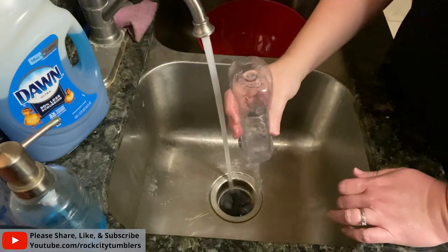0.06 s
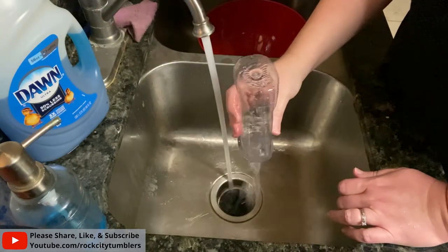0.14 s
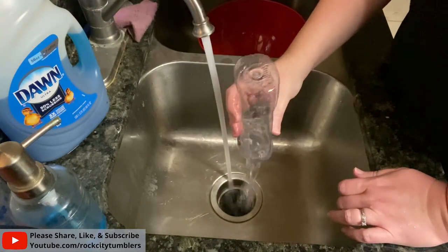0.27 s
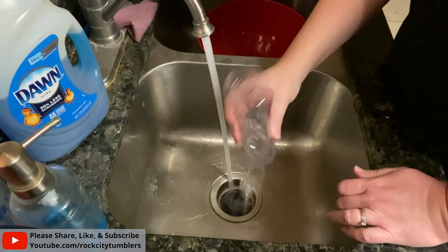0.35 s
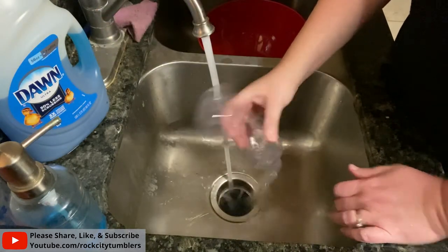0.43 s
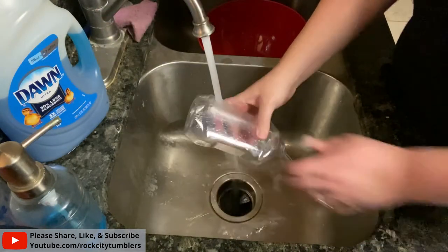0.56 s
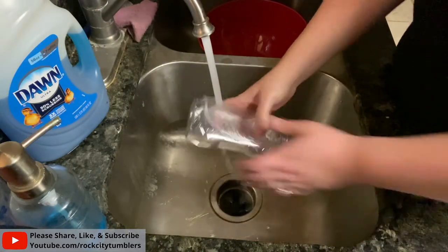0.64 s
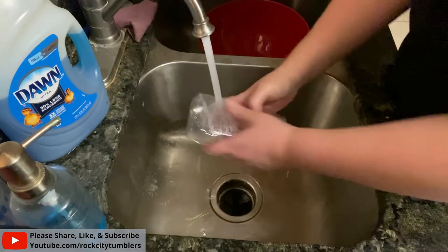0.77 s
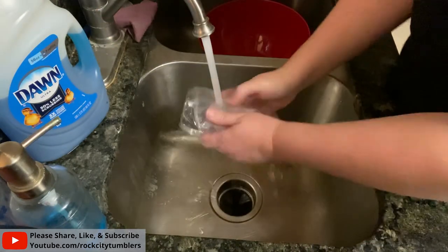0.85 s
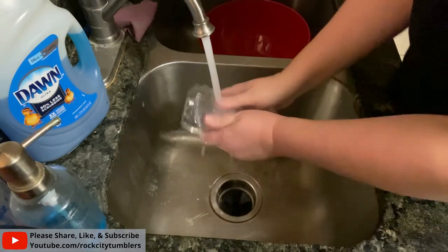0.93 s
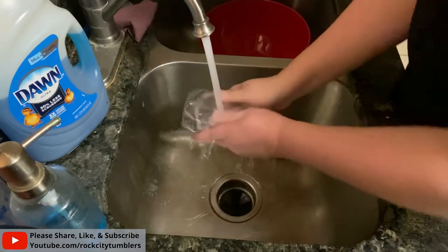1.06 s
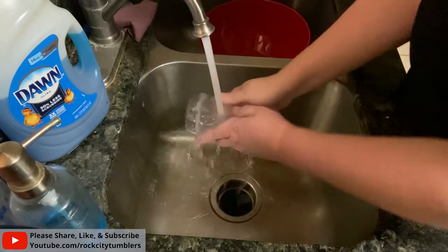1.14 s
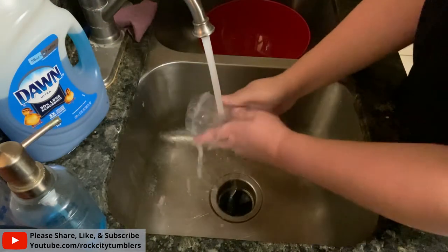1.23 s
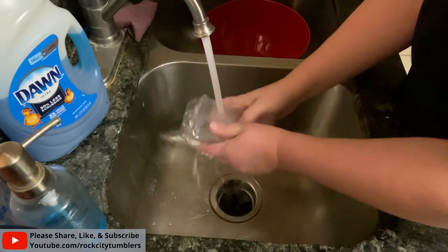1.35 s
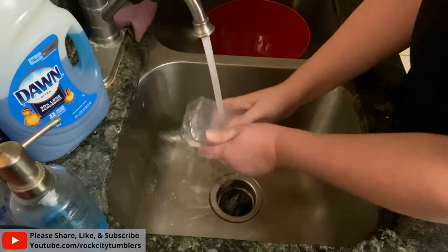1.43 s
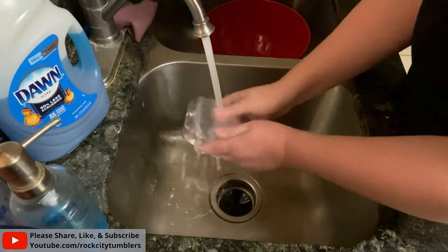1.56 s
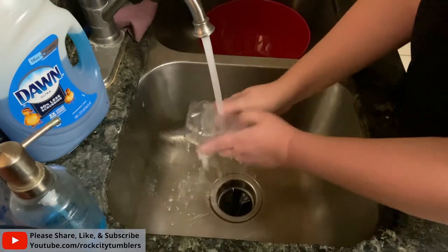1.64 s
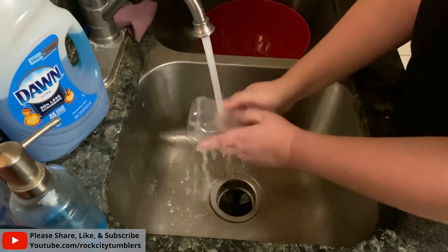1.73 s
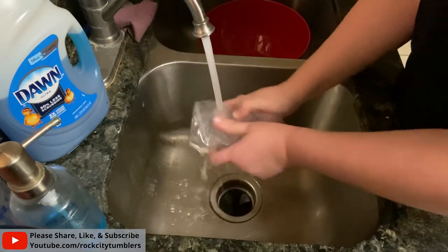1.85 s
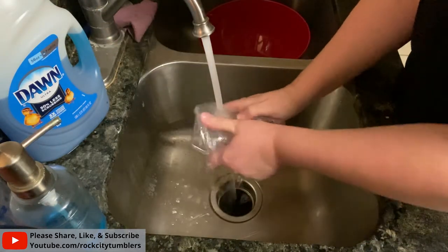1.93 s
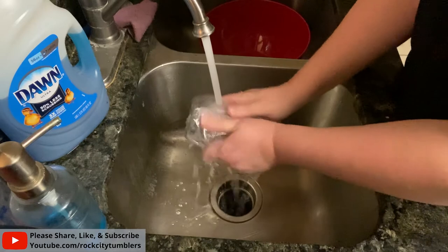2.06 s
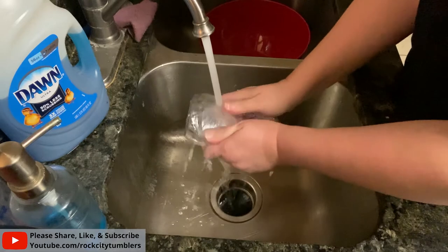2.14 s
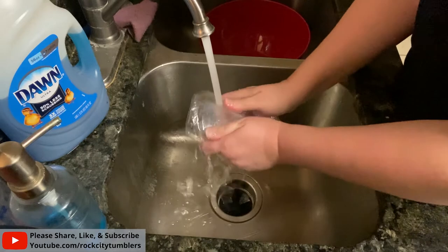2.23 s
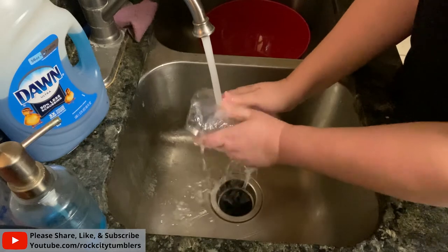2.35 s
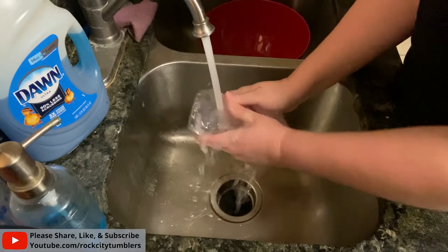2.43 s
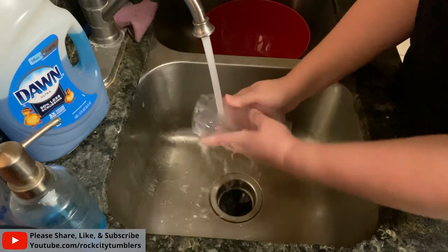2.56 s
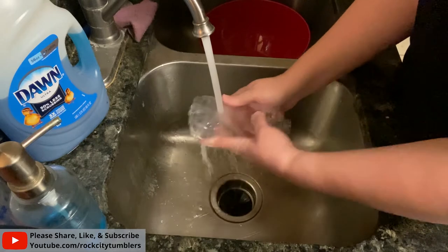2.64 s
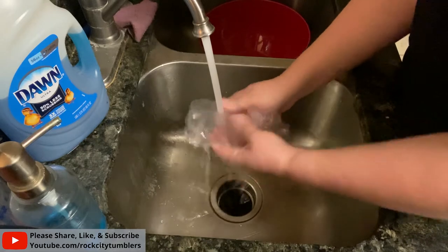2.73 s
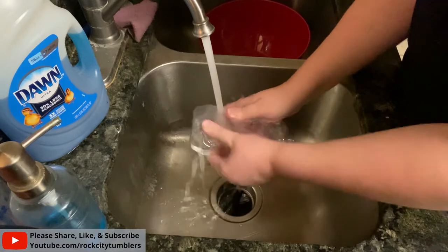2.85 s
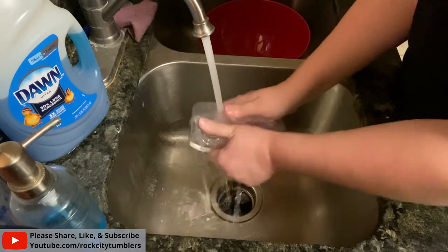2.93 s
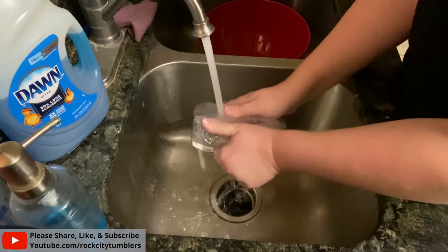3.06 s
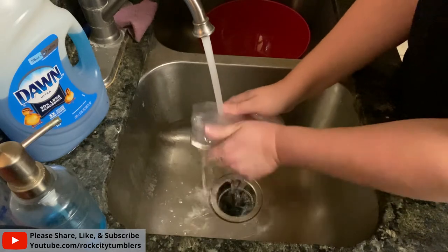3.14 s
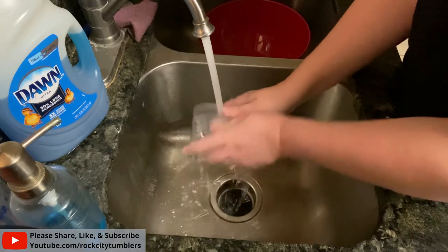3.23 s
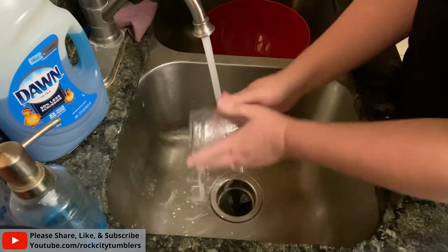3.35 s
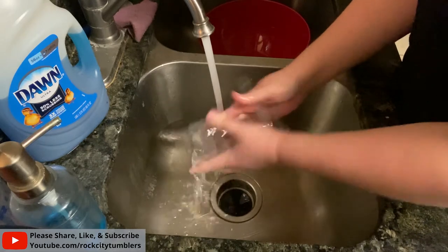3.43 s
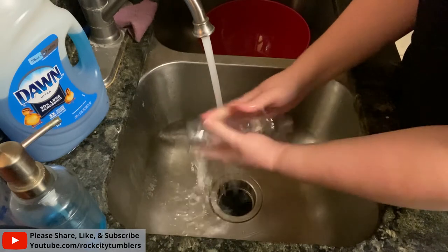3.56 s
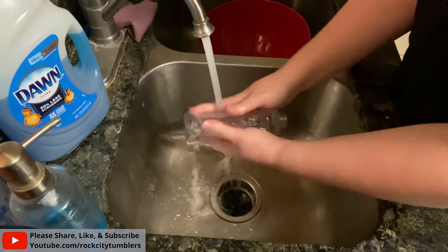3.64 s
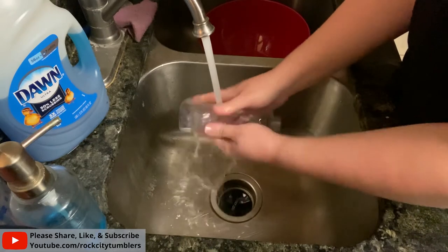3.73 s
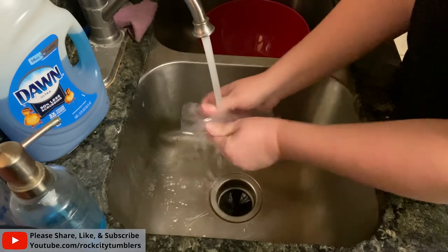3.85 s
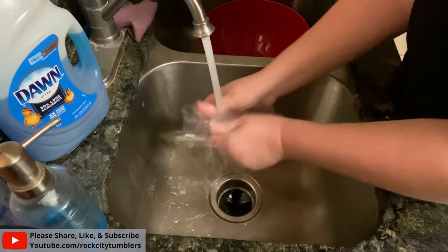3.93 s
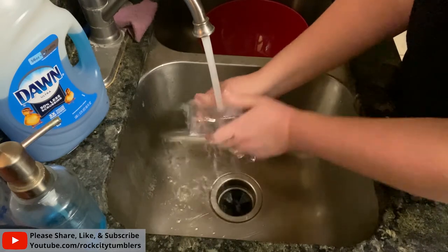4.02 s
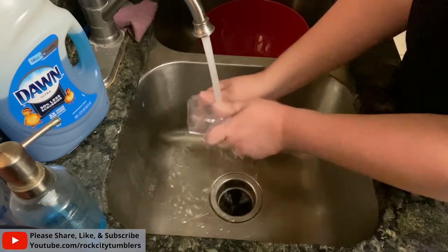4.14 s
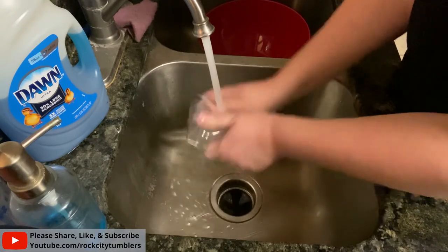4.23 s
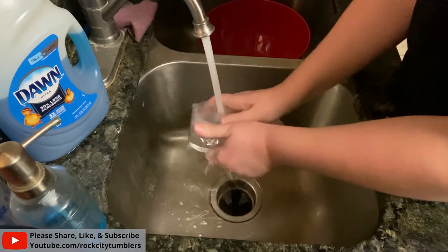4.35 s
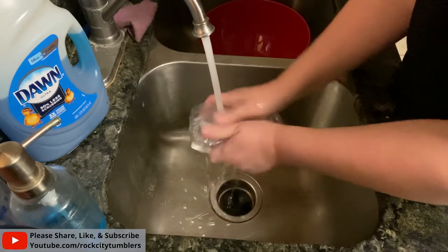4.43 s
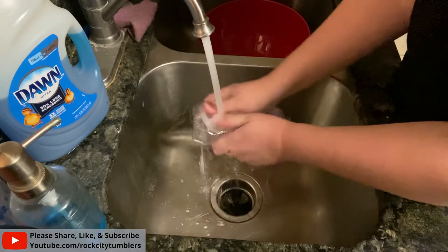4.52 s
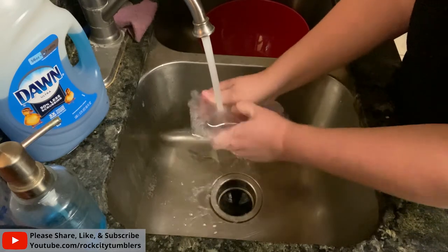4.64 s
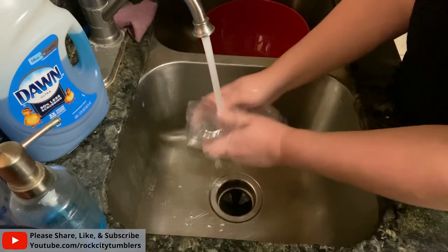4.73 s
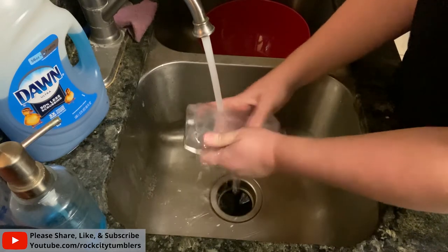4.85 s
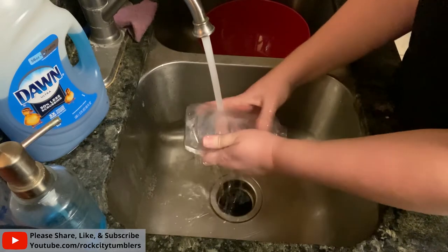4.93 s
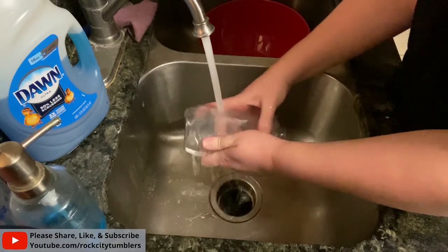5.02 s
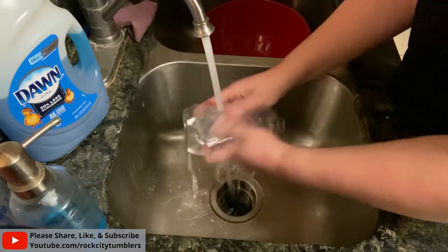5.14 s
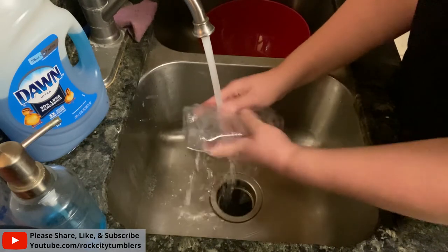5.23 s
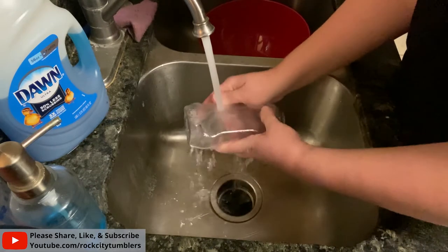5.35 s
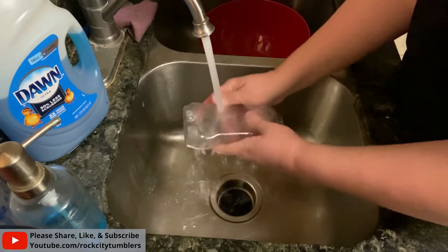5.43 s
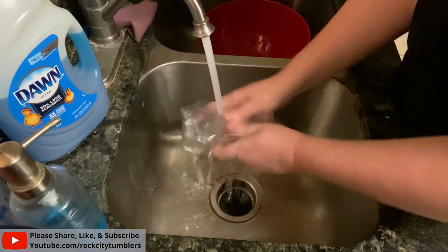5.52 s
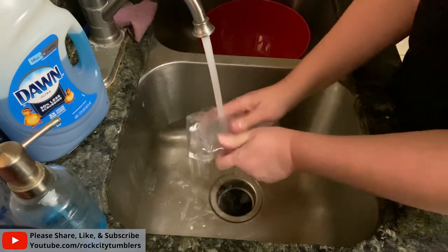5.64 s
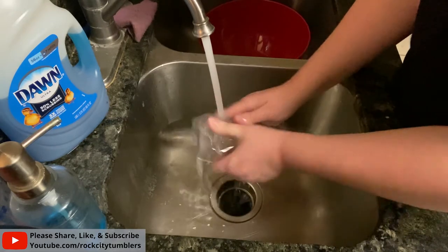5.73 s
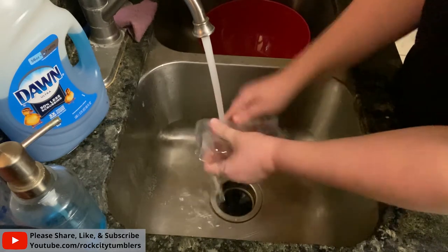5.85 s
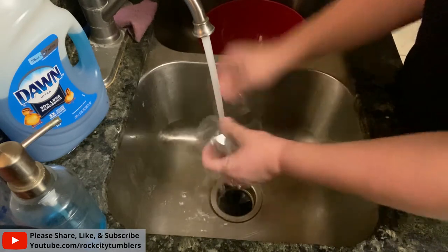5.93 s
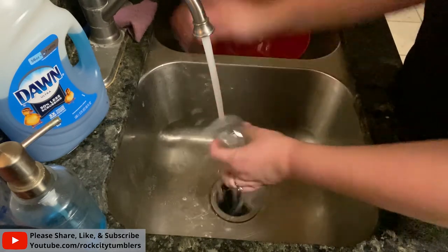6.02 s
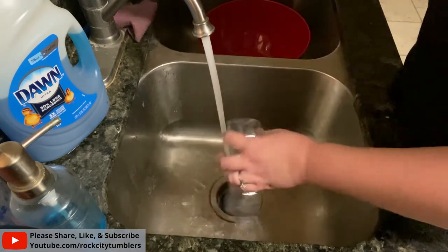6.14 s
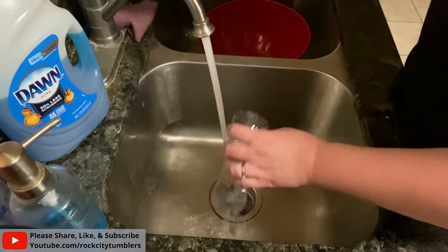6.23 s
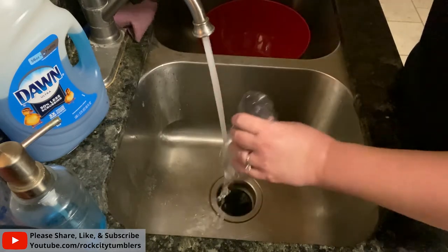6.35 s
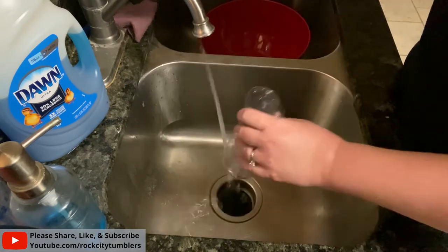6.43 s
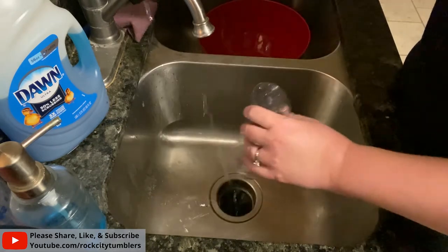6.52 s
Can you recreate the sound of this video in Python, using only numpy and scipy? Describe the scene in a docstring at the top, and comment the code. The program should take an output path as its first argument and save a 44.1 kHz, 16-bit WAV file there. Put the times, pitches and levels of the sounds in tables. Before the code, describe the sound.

A kitchen tap runs throughout with a bright, fizzy hiss, heard close and in stereo from above a steel sink. At first the stream patters lightly on the drain strainer, with a few soft thuds. From about 0.7 seconds, water spills off hands rinsing a plastic bottle, growing louder by 1 second. It lands in irregular surges, several a second, drumming hollowly on the sink floor, ringing the walls and spattering. Heavy lumps of water thud, a few ringing low around 1.6, 1.8 and 4.2 seconds. The drumming eases briefly after 3.2 seconds, then returns, with bubbly plops thickest from 3.7 to 5.7 seconds. Around 5.9 seconds the surges give way to a trickle, single drops tick on the steel, and the stream finds the drain again. At about 6.4 seconds the hiss dulls as the tap closes. A faint fridge hum and low rumble lie underneath.

```python
"""Water drums on a steel sink, spilling in surges off hands that rub a plastic bottle under a kitchen tap.
Each surge booms on the sink floor, rings the walls and spatters the rim; heavy lumps land as thuds,
a few ringing long and low. Bubbles plop and single drops tick on the steel. Behind them the tap's aerator
hisses, its stream fizzes and rings the drain strainer, and the hiss dulls as the valve shuts at the end.
A fridge hum and a low rumble lie underneath. The perspective is close stereo, from above the sink."""
import sys
import numpy as np
from scipy import signal
from scipy.fft import rfft, irfft, next_fast_len
from scipy.io import wavfile
from scipy.ndimage import map_coordinates

SR = 44100
rng = np.random.default_rng(int(sys.argv[2]) if len(sys.argv) > 2 else 0)


def inscribe(sig):
    """Save sig as 16-bit PCM at rate SR to the path in sys.argv[1].

    A 1-D sig is mono; a 2-D sig holds one channel per row.
    Samples are clipped to [-1, 1] before scaling.
    """
    pcm = np.round(np.clip(np.atleast_2d(sig).T, -1, 1) * 32767)
    wavfile.write(sys.argv[1], SR, pcm.astype(np.int16))


N = 290169

# Surges landing on steel: (start [s], rise [s], hold [s], drumming [dB], ringing [dB], spatter [dB])
SURGES = [(0.7, 0.05, 0.033, -39, -37, -56), (0.807, 0.094, 0.046, -33, -54, -52),
          (0.988, 0.033, 0.27, -26.5, -29.5, -33), (1.216, 0.045, 0.087, -24.5, -31, -35.5),
          (1.367, 0.046, 0.24, -22.5, -33, -36), (1.651, 0.074, 0.22, -23.5, -32.5, -35.5),
          (2, 0.056, 0.12, -30, -34, -40), (2.272, 0.027, 0.035, -28.5, -35, -37),
          (2.33, 0.17, 0.028, -19.5, -28.5, -33.5), (2.521, 0.034, 0.099, -35.5, -35.5, -36),
          (2.693, 0.034, 0.012, -30.5, -31.5, -31), (2.812, 0.011, 0.21, -22.5, -35, -37.5),
          (3.058, 0.08, 0.099, -30.5, -30, -37), (3.224, 0.054, 0.042, -39, -35, -36.5),
          (3.346, 0.038, 0.12, -41.5, -44.5, -40.5), (3.489, 0.044, 0.037, -34, -34.5, -39),
          (3.59, 0.027, 0.0091, -33, -39, -35), (3.658, 0.03, 0.054, -31.5, -27.5, -36),
          (3.726, 0.064, 0.095, -41, -28.5, -32.5), (3.86, 0.076, 0.11, -32, -31.5, -38.5),
          (4.076, 0.065, 0.17, -27.5, -29, -34.5), (4.392, 0.038, 0.14, -26.5, -30, -34),
          (4.56, 0.059, 0.088, -26.5, -33.5, -37.5), (4.653, 0.091, .12, -26, -25, -28),
          (4.88, 0.038, 0.063, -41, -43, -38.5), (5.068, 0.055, 0.057, -26.5, -28, -35.5),
          (5.219, 0.03, 0.0084, -22, -27.5, -42), (5.272, 0.029, 0.011, -22.5, -27.5, -36),
          (5.387, 0.048, 0.035, -32, -35.5, -38.5), (5.511, 0.03, 0.048, -28, -23.5, -30),
          (5.634, 0.039, 0.034, -26, -27.5, -34), (5.698, 0.029, 0.051, -31, -35.5, -43),
          (5.805, 0.022, 0.012, -33, -36, -37.5)]
# The trickle bed under the surges: (time [s], drumming [dB], ringing [dB], spatter [dB])
TRICKLE = [(0, -44, -50, -47.5), (.57, -39.5, -51, -47), (.6, -44.5, -51, -50), (.75, -40.5, -57, -46),
           (5.8, -49, -70, -68), (5.88, -37, -47.5, -46), (6.4, -44, -51, -56), (6.58, -50, -66, -74)]
# Tone of the spot the spill hits: (time [s], floor bass tilt [dB/octave], wall treble tilt [dB/octave])
LANDING_SPOT = [(0, 11.5, 10), (.5, 9, 11.5), (1, 0.5, -1), (1.5, 0.5, 5.5), (2, -2.5, -1), (2.5, 6, 1.5),
                (3, -3.5, 0.5), (3.5, -0.5, 0.5), (3.8, -8, 4), (4.1, -7, 4), (4.5, -3, -2.5),
                (4.9, 0, -1.5), (5.2, 3.5, 6), (5.6, 4, -1.5), (6, -2, 3), (6.58, 10, -5)]
# Resonances of the steel: (pitch [Hz], width [Hz], relative weight [dB], right-to-left gain [ratio])
FLOOR_MODES = [(144.3, 20, -11.5, 0.97), (191, 32, -5, 0.98), (232, 26.5, 0.5, 0.83), (289.8, 50.6, 3.5, 1),
               (359.2, 21.4, -2, 0.74), (404.5, 16, -14, 1)]
WALL_MODES = [(484, 124, 12, -0.57), (613.8, 22.4, 1.5, 0.43), (696, 22, -1, 0.034), (800, 41, -1.5, -0.15),
              (970, 100, 1.5, 1), (1108, 64, 1, 0.6), (1230, 65, 0, 0.63)]
RIM_MODES = [(1532, 46, -0.5, 0.79), (1791, 63, 4.5, 0.99), (1943, 43, 2.5, 0.97), (2296, 96, 4, 0.15),
             (2660, 126, 5.5, 0.78), (3012, 49, 2.5, 0.62), (3444, 65, 0, 0.49)]
STRAINER_MODES = [(2870, 250, 8.5, 0.4), (3600, 660, 6, 0.37), (4600, 330, 2, 0.23)]
# Heavy lumps of water: (time [s], peak before the bass cut [dB], pitch [Hz], relative splash [dB])
THUDS = [(0.234, -32, 247, -43), (0.369, -28, 142, -58), (0.471, -22, 149, -38), (0.546, -28, 138, -45),
         (0.722, -27.5, 377, -38), (0.833, -28, 312, -27), (0.871, -22.5, 323, -28), (0.892, -25, 273, -30),
         (0.932, -21.5, 288, -26), (0.966, -21, 250, -33), (1.005, -19, 304, -39), (1.023, -12.5, 263, -40),
         (1.057, -17.5, 237, -34), (1.128, -24, 370, -43), (1.266, -20, 250, -25), (1.3, -16, 236, -36),
         (1.353, -15.5, 252, -44), (1.427, -12.5, 211, -34), (1.528, -22, 232, -32), (1.664, -16, 196, -24),
         (1.727, -11, 292, -45), (1.848, -15, 260, -40), (1.875, -25, 290, -38), (1.92, -14.5, 254, -32),
         (2.038, -24, 276, -22), (2.122, -20, 199, -48), (2.15, -18, 260, -44), (2.297, -20.5, 175, -30),
         (2.313, -17.5, 358, -40), (2.455, -19.5, 317, -44), (2.499, -16.5, 210, -43),
         (2.723, -26, 230, -35), (2.825, -10, 285, -19.5), (2.862, -19, 300, -48), (2.9, -18.5, 320, -29),
         (2.966, -15, 310, -25), (2.984, -17, 320, -23), (3.013, -15.5, 325, -23.5), (3.134, -29, 327, -32),
         (3.166, -25, 219, -41), (3.33, -18, 314, -30), (3.416, -28, 144, -27), (3.459, -41, 142, -28),
         (3.541, -22.5, 258, -42), (3.62, -21, 276, -25), (3.685, -22, 330, -28), (3.71, -20, 300, -30),
         (3.884, -19, 340, -36), (3.913, -13, 301, -21), (3.95, -14, 268, -23), (4.018, -15.5, 317, -27),
         (4.067, -21.5, 373, -28), (4.184, -10.5, 254, -44), (4.219, -18, 292, -41),
         (4.265, -12.5, 274, -20), (4.446, -15.5, 273, -36), (4.481, -12, 268, -37),
         (4.493, -9.5, 285, -38), (4.565, -18.5, 325, -20), (4.596, -17.5, 334, -21),
         (4.754, -16.5, 263, -20), (4.817, -16.5, 347, -32), (4.843, -14, 278, -28), (5.111, -23, 287, -28),
         (5.148, -20, 190, -18), (5.244, -13, 241, -18), (5.301, -14.5, 253, -33), (5.315, -16, 348, -36),
         (5.523, -19.5, 337, -29), (5.669, -30, 320, -17), (5.684, -19, 234, -35), (5.699, -19, 232, -36),
         (5.829, -16, 308, -27)]
# Bubble plops, plus a few long, low ringing thuds of water on the sink floor (the 236-330 Hz rows):
# (time of the peak [s], peak before panning [dB], pitch [Hz], t60 [s])
PLOPS_AND_LONG_THUDS = [(.18, -36, 905, 0.061), (.727, -31.5, 1450, 0.027), (0.742, -31, 1206, 0.14),
                        (0.875, -31.5, 1184, 0.03), (.941, -34, 620, 0.04), (1.012, -31, 744, 0.06),
                        (1.04, -28, 689, 0.037), (1.067, -23, 628, 0.054), (1.142, -26.5, 544, 0.043),
                        (1.224, -30, 1970, .03), (1.242, -23.5, 611, 0.047), (1.75, -27, 990, .03),
                        (1.57, -20.5, 235.7, 0.31), (1.818, -13.5, 292.8, 0.29), (1.945, -29, 724, 0.056),
                        (2.75, -19.5, 618, 0.073), (2.83, -28, 547, 0.023), (2.973, -33, 2476, 0.03),
                        (3.017, -29, 1195, 0.028), (3.145, -32, 1033, 0.027), (3.463, -31, 2560, .035),
                        (3.468, -29, 631, 0.069), (3.715, -31, 1250, 0.085), (3.74, -20.5, 671, 0.067),
                        (3.767, -25, 1090, 0.071), (3.755, -33, 2250, .04), (3.769, -37, 2270, 0.1),
                        (3.771, -32, 1670, 0.073), (3.816, -30, 1700, 0.074), (3.799, -18.5, 1080, 0.0445),
                        (3.773, -34, 3270, .06), (3.797, -39, 2680, .05), (3.848, -35, 2950, 0.057),
                        (3.868, -30, 3030, 0.036), (3.818, -20.5, 1079, 0.0446),
                        (3.865, -24.5, 2250, 0.0237), (3.973, -20.5, 787, 0.085), (3.991, -19, 633, 0.047),
                        (4.025, -24, 635, 0.031), (4.139, -25, 580, 0.05), (4.164, -24, 600, 0.043),
                        (4.227, -28, 1023, 0.061), (4.24, -15, 319, 0.17), (4.441, -26, 1220, 0.035),
                        (4.469, -21, 623, 0.091), (4.713, -22.5, 585, 0.068), (4.728, -27.5, 2480, 0.0413),
                        (4.769, -19.5, 664, 0.15), (4.774, -25, 1170, 0.032), (4.784, -26.5, 1970, 0.065),
                        (4.819, -31, 1886, 0.036), (4.927, -30.5, 718, 0.094), (4.955, -28, 2095, 0.029),
                        (4.958, -30.5, 2760, .03), (4.959, -28.5, 763, 0.079), (5.152, -37, 2340, 0.086),
                        (5.166, -14.5, 982, 0.057), (5.166, -35, 1950, 0.035), (5.247, -23, 1104, 0.035),
                        (5.247, -31, 2270, 0.033), (5.306, -26, 665, 0.032), (5.32, -24, 710, 0.044),
                        (5.537, -31, 3380, 0.071), (5.548, -32, 648, 0.1), (5.56, -30, 1800, .03),
                        (5.565, -20, 903, 0.046), (5.584, -20.5, 960, 0.062), (5.671, -35, 2620, 0.053),
                        (5.676, -21, 926, 0.047), (5.707, -27, 1450, .03), (5.843, -24, 330, 0.1)]
# Single drops: (time [s], peak before panning [dB], pitch [Hz])
TICKS = [(0.495, -21, 3380), (0.847, -27, 3500), (1.9608, -20, 3200), (3.4195, -24, 8200),
         (3.540, -22, 4000), (4.4845, -21, 4360), (4.745, -25, 2760), (4.959, -24, 3150), (5.52, -25, 3250),
         (5.668, -28, 2600), (6.092, -27, 3060), (6.14, -28, 2990), (6.494, -23, 8050), (6.561, -26, 4700)]
# Faders of the running tap: (time [s], aerator hiss [dB], stream fizz [dB])
TAP_LEVELS = [(0.0, -36.5, -39), (0.57, -35.5, -38.5), (0.62, -37, -41), (0.9, -37, -39.5),
              (2.0, -36.5, -40), (4.86, -37, -39.5), (6.14, -36.5, -39), (6.58, -38, -41.5)]
# The valve shuts and dulls the hiss: (time [s], treble gain [dB])
VALVE_CLOSING = [(0, -0.5), (6.35, 0), (6.38, -8), (6.54, -6), (6.58, -18)]
# The free stream reaching the drain: (time [s], level [dB])
DRAIN_LEVELS = [(0, -44), (.17, -40.5), (.34, -42.5), (.45, -43), (.57, -42), (.61, -61), (6.05, -80),
                (6.2, -43.5), (6.45, -49), (6.58, -70)]
# EQ curves of the noise layers: (frequency [Hz], relative gain [dB])
SPATTER_EQ = [(900, -8), (1400, 3), (1850, 3.5), (2300, 4), (3200, 3), (4500, 1.5), (6500, -4.5),
              (12000, -28)]
FIZZ_EQ = [(400, -18), (900, -3), (2300, -3), (2800, -1), (4000, 4.5), (5200, 5.5), (6500, 6), (12000, -42)]
HISS_EQ = [(3000, -48), (5500, -40), (6500, -6.5), (7500, -1), (10000, -4), (12500, -1), (13500, -5),
           (16000, -12.5)]
RUMBLE_EQ = [(25, -28), (45, 0), (90, 9.5), (130, 18.5), (300, -39)]

LUMPY_DB = 2  # spread of drop strengths: more sounds grainier
FOAM_CYCLES = 60  # cycles in which a foam bubble fades by 60 dB


def basin():
    """Spilled water drums on the sink floor, rings its walls and rim, and spatters."""
    drum_db, ring_db, spatter_db = spill_levels()
    bass_tilt, treble_tilt = curves(LANDING_SPOT)
    clumps = wobble(30)  # the spill comes in clumps that all parts feel
    spray = spatter()
    floor = struck_steel(FLOOR_MODES, count=4000, wander_hz=9, wander_db=3, tilt_db=-bass_tilt)
    walls = struck_steel(WALL_MODES, count=2500, wander_hz=14, wander_db=4, tilt_db=treble_tilt)
    wall_gain = np.sqrt(amp(2 * (ring_db + 0.83 * clumps)) + amp(-3.5) * splash_power(t60=0.091))
    spray_gain = np.sqrt(amp(2 * (spatter_db + 0.66 * clumps)) + amp(-9) * splash_power(t60=0.076))
    return amp(drum_db + 0.58 * clumps) * floor + wall_gain * walls + spray_gain * spray


def spill_levels(rise_db=18, sag_db_per_s=15.5, tail_t60=0.2):
    """Drumming, ringing and spatter faders in dB: each surge swells, sags and tails off over a trickle."""
    start, rise, hold, *levels = np.transpose(SURGES)
    t = np.arange(0, N / SR, 1 / 500)
    age = t - (start + rise)[:, None]  # seconds past each crest
    swell_db = rise_db * np.minimum(age, 0) / rise[:, None]
    sag_db = sag_db_per_s * np.clip(age, 0, hold[:, None])
    tail_db = 60 * np.maximum(age - hold[:, None], 0) / tail_t60
    powers = amp(2 * np.array(levels)) @ amp(2 * (swell_db - sag_db - tail_db))
    return [10 * np.log10(np.interp(np.arange(N) / SR, t, power) + amp(2 * trickle_db))
            for power, trickle_db in zip(powers, curves(TRICKLE))]


def struck_steel(table, count, wander_hz, wander_db, tilt_db=0):
    """Random drops ring the steel; the landing spot wanders and favours now one mode, now another."""
    octave = np.log2(np.transpose(table)[0])[:, None]
    force = drops(count, LUMPY_DB, wash=0.96, channels=len(table))
    tilt = amp(tilt_db * (octave - octave.mean()))
    wander = amp(wander_db * np.array([wobble(wander_hz) for mode in table]))
    return unit(resonate(force * tilt * wander, table))


def spatter():
    """The wet top layer: fine drops and small bubbles, with the rim ringing along."""
    patter = drops(count=9000, spread_db=LUMPY_DB, wash=0.99)
    foam = 0.59 * bubbles(count=3500, hz=2430, spread=0.442, cycles=120, spread_db=3)
    wet = stereo(patter + foam, SPATTER_EQ, alike=0.22, lag_s=0.00006)
    return wet + amp(-6.5) * struck_steel(RIM_MODES, count=2500, wander_hz=18, wander_db=4)


def splash_power(t60):
    """Power envelope of the spray thrown up by the heavy lumps: fast attack, short tail."""
    hits = np.zeros(N)
    for s, *_, splash_db in THUDS:
        hits[round(s * SR)] = amp(2 * splash_db)
    t = np.arange(SR // 5) / SR
    decay = amp(-120 * t / t60) * (1 - np.exp(-t / 0.0041)) ** 2
    return np.abs(signal.fftconvolve(hits, decay)[:N])


def thuds(bass_cut_hz=70):
    """Heavy lumps thump the floor at the pitch of their landing spot; the small basin has little sub."""
    out = np.zeros((2, N))
    for s, db, hz, _ in THUDS:
        place(out, blip(hz, t60=0.06, attack_s=0.0033, glide=0.015), s, db, left_db=0.7)
    return filtered(out, lambda f: (1j * f / (bass_cut_hz + 1j * f)) ** 2)


def plops_and_long_thuds():
    """Bubbles plop, and a few thuds of water ring low on the sink floor; longer tones start softer."""
    out = np.zeros((2, N))
    for peak_s, db, hz, t60 in PLOPS_AND_LONG_THUDS:
        attack_s = 0.003 + 0.04 * t60
        time_to_peak = attack_s * np.log(1 + 2 * t60 / (np.log(1000) * attack_s))
        place(out, blip(hz, t60, attack_s, glide=0.033), peak_s - time_to_peak, db, left_db=1.5)
    return out


def ticks():
    """A single drop bursts on the steel: a rough ring near its pitch inside a puff of spray."""
    out, t = np.zeros((2, N)), np.arange(2000) / SR
    f = np.fft.rfftfreq(len(t), 1 / SR)
    spray = amp(-14) * 1j * f / (2500 + 1j * f) / (1 + 1j * f / 8000) ** 2
    for s, db, hz in TICKS:
        ring = bandpass(f, hz, width=0.1 * hz)
        noise = rng.standard_normal(len(t)) + 0.6 * rng.standard_normal((2, len(t)))
        burst = irfft(rfft(noise) * (ring + spray)) * envelope(t, t60=0.03, attack_s=0.002)
        place(out, burst, s, db, left_db=-1.5)
    return out


def tap():
    """The running tap: hiss and fizz flutter together, and the free stream rings the drain strainer."""
    hiss_db, fizz_db = curves(TAP_LEVELS)
    hiss, fizz = aerator_hiss(), stream_fizz()
    drain_hits = drops(count=1500, spread_db=3, wash=0.6, channels=len(STRAINER_MODES))
    strainer = unit(resonate(drain_hits, STRAINER_MODES))
    flutter_db = 0.35 * wobble(9) + 0.6 * wobble(18)
    hiss *= amp(hiss_db + flutter_db + 0.69 * wobble(10))
    strainer *= amp(curves(DRAIN_LEVELS)[0] + 2.8 * wobble(13))
    fizz *= amp(fizz_db + flutter_db + 1.53 * wobble(12)) * amp([[-1.1], [1.1]])
    return hiss + strainer + fizz


def aerator_hiss(treble_hz=9000):
    """The aerator hisses from one spot, a little to the right; less pressure dulls the jet first."""
    jet = drops(count=20000, spread_db=7, wash=2.25)
    foam = 0.55 * bubbles(count=3000, hz=9490, spread=0.264, cycles=FOAM_CYCLES, spread_db=2)
    hiss = stereo(jet + foam, HISS_EQ, alike=0.9, lag_s=-0.0001727, phase_rad=1.52)
    treble = filtered(hiss, lambda f: 1 / (1 + (treble_hz / (f + 1)) ** 6))
    return hiss - treble + amp(curves(VALVE_CLOSING)[0]) * treble


def stream_fizz():
    """The stream fizzes where it breaks into droplets and foam."""
    foam = 0.62 * bubbles(count=3500, hz=4010, spread=0.361, cycles=FOAM_CYCLES, spread_db=2.5)
    droplets = drops(count=12000, spread_db=LUMPY_DB, wash=1.32)
    return stereo(droplets + foam, FIZZ_EQ, alike=0.42, lag_s=0.00007)


def fridge(hum_hz=59.3, hum_db=-51, rumble_db=-49):
    """Room tone: the fridge hums, a little unsteadily, over a low rumble."""
    phase = 2 * np.pi * np.cumsum(hum_hz + 0.86 * wobble(3.3)) / SR
    hum = np.sqrt(2) * np.sin(phase) * amp(hum_db + 0.37 * wobble(2.9))
    rumble = stereo(rng.standard_normal((2, N)), RUMBLE_EQ, alike=0.98, lag_s=0)
    return hum + amp(rumble_db) * rumble


def drops(count, spread_db, wash, channels=2):
    """Random impacts that every channel feels at its own strength, over a wash of noise."""
    when, size = rng.random((count, 2)).T
    strength = amp(-spread_db * np.log(size + 0.082))
    hits = np.zeros((channels, N))
    hits[:, (when * N).astype(int)] = strength * rng.standard_normal((count, channels)).T
    return unit(hits) + wash * rng.standard_normal((channels, N))


def bubbles(count, hz, spread, cycles, spread_db):
    """Two random clouds of small bubbles pitched around hz; each rings for some cycles, gliding up."""
    when, size, cloud = rng.random((count, 3)).T[:, :, None]
    pitch = hz * np.exp(spread * rng.standard_normal((count, 1)))
    step = np.arange(700)
    turns = pitch * step / SR
    tone = np.sin(2 * np.pi * turns * (1 + 0.029 * turns / cycles))
    tone *= amp(-60 * turns / cycles) * (1 - np.exp(-turns / 0.35))
    tone *= amp(-spread_db * np.log(size + 0.03)) * (pitch < SR / 3)
    span = N + len(step)
    index = (when * N).astype(int) + step + (cloud > 0.5) * span  # the clouds lie end to end
    return unit(np.bincount(index.ravel(), tone.ravel(), 2 * span).reshape(2, -1)[:, :N])


def resonate(force, table):
    """Each row of force rings one mode; water lands softly, driving a broad band around that mode."""
    hz, width, db, right = np.transpose(table)[:, :, None]
    rings = filtered(force, lambda f: amp(db) * bandpass(f, hz, width) * bandpass(f, hz, 0.37 * hz) / width)
    echo = np.roll(rings, 900, axis=1)  # the far wall answers later
    echo_gain = 0.6 * np.sqrt(1 - right ** 2)
    return np.array([rings.sum(0), (right * rings + echo_gain * echo).sum(0)])


def stereo(pair, eq, alike, lag_s, phase_rad=0):
    """EQ a mid and a side signal into left and right; alike=1 is narrowest, lag_s makes the right late."""
    angle = np.arccos(alike) / 2
    mid, side = np.cos(angle) * pair[0], np.sin(angle) * pair[1]
    eq_hz, eq_db = np.transpose(eq)

    def response(f):
        gain = amp(np.interp(np.log(f + 1), np.log(eq_hz + 1), eq_db))
        return gain * np.exp(1j * np.outer([0.5, -0.5], 2 * np.pi * f * lag_s + phase_rad))
    return unit(filtered(np.array([mid + side, mid - side]), response))


def blip(hz, t60, attack_s, glide):
    """A short damped tone whose pitch rises as it dies."""
    t = np.arange(SR // 4) / SR
    return np.sin(2 * np.pi * hz * t * (1 + glide * t / t60)) * envelope(t, t60, attack_s)


def envelope(t, t60, attack_s):
    """A rounded attack into an exponential tail."""
    return amp(-60 * t / t60) * (1 - np.exp(-t / attack_s)) ** 2


def place(track, sound, s, peak_db, left_db):
    """Lay a one-shot on the track at s seconds, panned up by left_db on the left and down on the right."""
    panned = amp(peak_db) * amp([[left_db], [-left_db]]) * sound / np.abs(sound).max()
    start = round(s * SR)
    track[:, start:start + panned.shape[1]] += panned[:, :N - start]


def bandpass(f, hz, width):
    """Complex response of one resonance at hz."""
    return 1j * f * width / (hz * hz - f * f + 1j * f * width)


def filtered(x, response):
    """x through a filter given as a function of frequency."""
    size = next_fast_len(N + SR // 4)
    return irfft(rfft(x, size) * response(np.fft.rfftfreq(size, 1 / SR)), size)[..., :N]


def curves(rows):
    """Automation lanes: one value per sample for each column after the time."""
    times, *columns = np.transpose(rows)
    return [np.interp(np.arange(N) / SR, times, column) for column in columns]


def wobble(rate):
    """Smooth random modulation, rate knots a second."""
    knots = rng.standard_normal(int(N * rate / SR) + 4)
    step = np.arange(0, N + 100, 100)
    return np.interp(np.arange(N), step, map_coordinates(knots, [step * rate / SR]))


def amp(db):
    """dB to gain."""
    return 10 ** (np.asarray(db) / 20)


def unit(x):
    """x at rms 1."""
    return x / np.sqrt(np.mean(x ** 2) + 1e-20)


def scene():
    """The stereo mix, from the sink in front to the room tone behind."""
    return basin() + thuds() + plops_and_long_thuds() + ticks() + tap() + fridge()


def record(dry):
    """A brick-wall high cut at 15.8 kHz."""
    return filtered(dry, lambda hz: hz < 15800)


dry = scene()
out = record(dry)
inscribe(out)
```